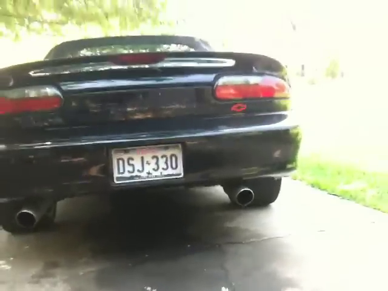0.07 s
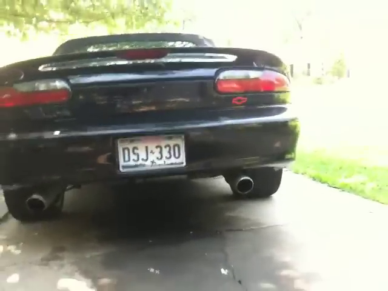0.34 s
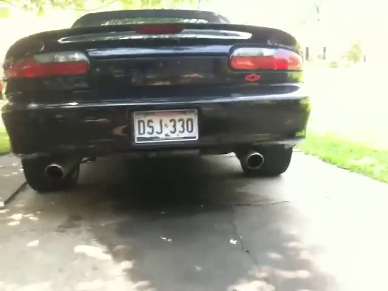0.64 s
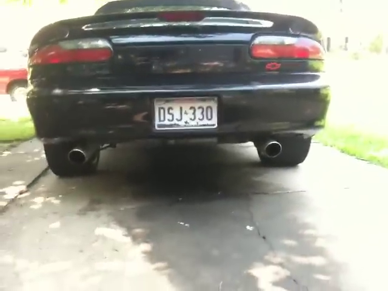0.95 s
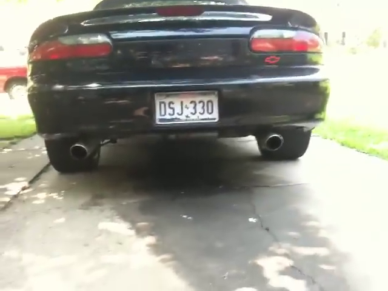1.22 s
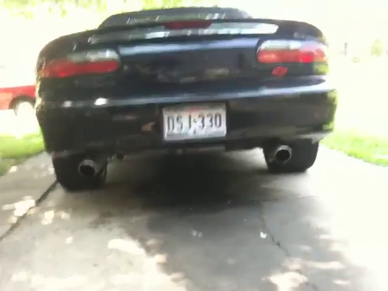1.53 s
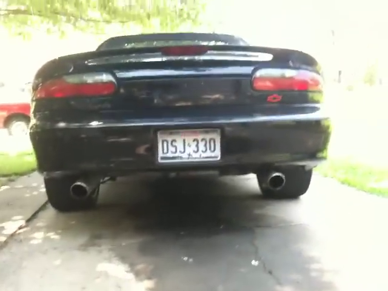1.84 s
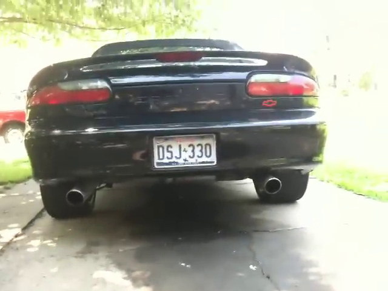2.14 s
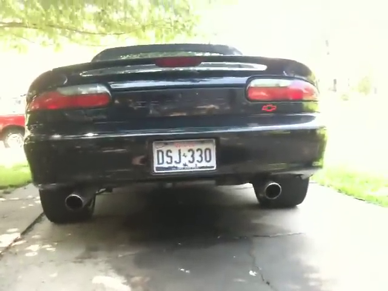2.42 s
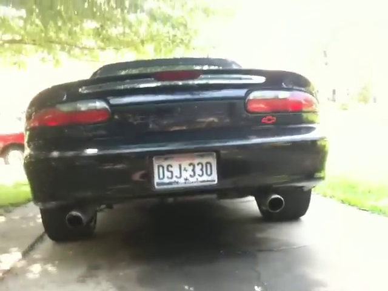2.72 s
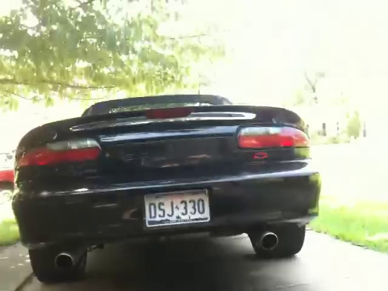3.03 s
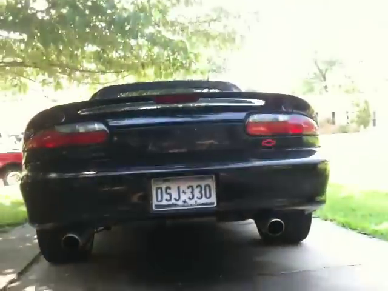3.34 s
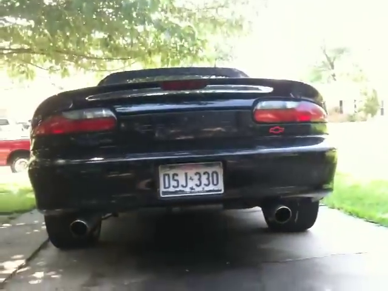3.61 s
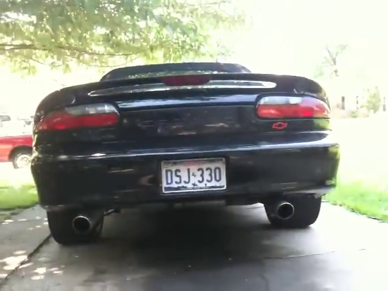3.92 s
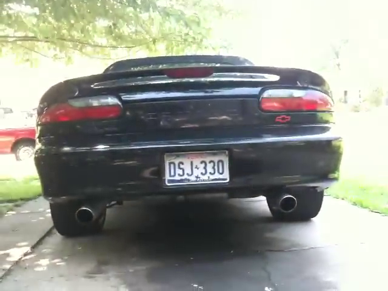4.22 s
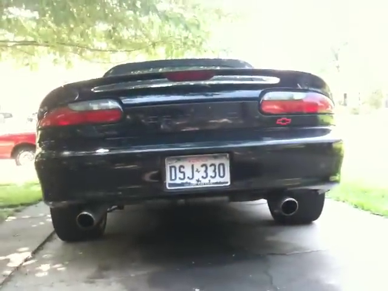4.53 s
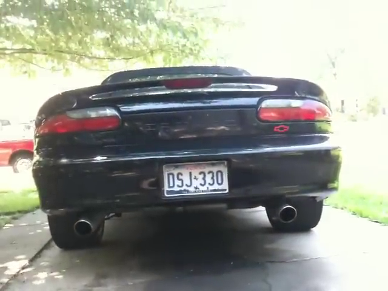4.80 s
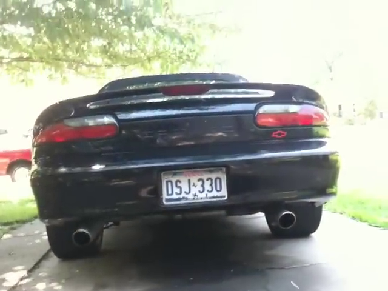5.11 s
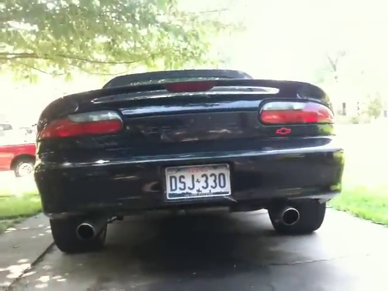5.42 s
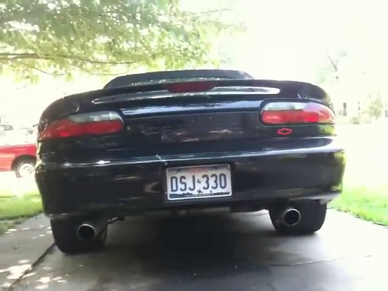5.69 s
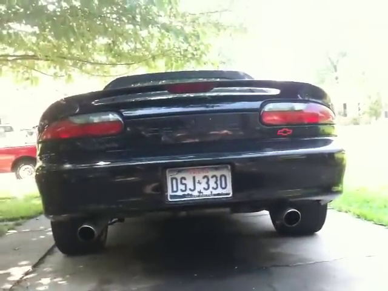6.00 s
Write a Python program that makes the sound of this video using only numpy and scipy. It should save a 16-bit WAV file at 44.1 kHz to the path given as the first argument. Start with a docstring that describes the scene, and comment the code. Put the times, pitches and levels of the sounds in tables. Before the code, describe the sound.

A V8 car idles in an outdoor driveway, heard close behind its twin open exhaust pipes for about six seconds. The deep, loping rumble is there from the start, throbbing roughly six times a second over a low drone. The speed stays steady, with an occasional slightly harder throb. Between 0.3 and 0.7 seconds the tone shifts a little as the microphone moves behind the car. A soft hiss of gas pulses with the exhaust throughout. Light valve ticking slowly grows, with small, sharper metallic ticks scattered from about 0.8 seconds and more frequent after 2 seconds. A very faint thin whine fades in around 3.6 seconds and stays. Far below the engine, overhead leaves stir in a breeze, and a few faint, distant bird chirps come during the first 3 seconds. The idle carries on unchanged to the end.

```python
"""Idling V8 with open pipes

A V8 idles at about 700 rpm through two straight pipes, heard from behind the car in a driveway.
Each bank fires four unevenly spaced pulses per cycle and excites the standing waves of its own pipe,
so the rumble lopes over a low drone. Gas rushes at the tips, valves tick and a thin whine comes in.
Leaves stir overhead, with a few faint, far chirps."""
import sys
import numpy as np
from scipy import signal
from scipy.io import wavfile
from scipy.ndimage import uniform_filter1d

SR = 44100
rng = np.random.default_rng(int(sys.argv[2]) if len(sys.argv) > 2 else 0)


def transcribe(signal):
    """Save signal, clipped to [-1, 1], as a 16-bit WAV file at the path in sys.argv[1]."""
    frames = np.atleast_2d(signal).T
    limited = np.clip(frames, -1, 1)
    pcm = np.round(limited * 32767).astype(np.int16)
    wavfile.write(sys.argv[1], SR, pcm)


N = 271215
TIME = np.arange(N) / SR


# The idle hunts gently. Each row: time in seconds, speed in rpm.
IDLE_SPEED = [(0.0, 699.1), (0.26, 704.5), (0.51, 700.4), (0.77, 699.1), (1.03, 705.7), (1.28, 710.1),
              (1.54, 705.4), (1.79, 704.3), (2.05, 700.0), (2.31, 703.0), (2.56, 703.9), (2.82, 705.8),
              (3.08, 700.6), (3.33, 701.7), (3.59, 702.1), (3.84, 705.6), (4.1, 699.9), (4.36, 700.0),
              (4.61, 699.6), (4.87, 698.7), (5.13, 707.7), (5.38, 711.0), (5.64, 704.6), (5.89, 700.4),
              (6.15, 705.6)]

def crank_times(degrees):
    """A four-stroke cycle takes two turns: the times [cycle, angle] when the crank passes each angle."""
    t = np.arange(-SR, N + SR) / SR
    cycles = np.cumsum(curve(IDLE_SPEED, t)) / (2 * 60 * SR)
    cycles -= cycles[SR]
    return np.interp(np.arange(-4, 38)[:, None] + np.asarray(degrees) / 720, cycles, t)


def crank_angle():
    """The phase of the engine cycle at every sample, from 0 to 720 degrees."""
    starts = crank_times([0]).ravel()
    return np.interp(TIME, starts, np.arange(len(starts))) % 1 * 720


# The firings of one cycle. Each row: crank angle in degrees, pipe, pulse level in dB.
FIRINGS = [(33.97, "right", -7), (125.97, "left", -3), (220.27, "right", 0.43), (305.86, "right", 0.34),
           (398.46, "left", -2), (487.2, "right", -2), (578.4, "left", -1.13), (664, "left", -3.5)]
# Drive of the strongest waves (the boom) and of those above. Each row: time in seconds, gain in dB.
BOOM_GAIN = [(0.0, -2.3), (0.34, 0.4), (0.68, -2.5), (1.02, -0.3), (1.37, -0.5), (1.71, -0.0), (2.05, -2.1),
             (2.39, -0.5), (2.73, 2.2), (3.08, 0), (3.42, -0.4), (3.76, -2.6), (4.1, -0.8), (4.44, -1),
             (4.78, -1.7), (5.12, -4), (5.47, 0.8), (5.81, -0.9), (6.15, -4.3)]
UPPER_GAIN = [(0.0, -2.8), (0.68, -2.4), (1.37, -2), (2.05, -4), (2.73, -2.0), (3.42, -2.2), (4.1, -3.0),
              (4.78, -1.2), (5.47, -2), (6.15, -1.6)]
# Turbulence against the clean pulse. Each row: frequency in Hz, relative level in dB.
TURBULENCE = [(60, 11), (120, -15), (220, -15.5), (260, -12), (350, -4.5), (450, 2.5)]

def pipe(side, modes, level_db=0.65, puff_s=0.0093, scatter_db=0.92, jitter_s=0.00012):
    """Impulse excitation: each firing's clean pulse and turbulent puff ring the pipe's standing waves."""
    degrees, pulse_db = np.transpose([(angle, db) for angle, bank, db in FIRINGS if bank == side])
    fired = crank_times(degrees)
    fired += jitter_s * rng.standard_normal(fired.shape)
    burn_db = level_db + pulse_db + scatter_db * rng.standard_normal(fired.shape)  # no two burn alike
    boom_db, upper_db = curve(BOOM_GAIN, fired), curve(UPPER_GAIN, fired)
    millisecond = SR / 1000
    eddies = rng.standard_normal(N + SR)
    out = np.zeros(N + SR)
    for hz, width_hz, mode_db in modes:
        boom_share = np.interp(hz, [180, 200, 305, 325], [.2, 1, 1, .1])
        upper_share = np.interp(hz, [305, 325], [0, 1])
        drive_db = burn_db + boom_share * boom_db + upper_share * upper_db
        pulses = click_train(fired, millisecond * from_db(drive_db))
        gas = from_db(curve(TURBULENCE, hz)) * puffs(pulses, puff_s) * eddies
        out += from_db(mode_db) * resonate(pulses + gas, hz, width_hz)
    return out[SR:]


# Standing waves of each pipe. Each row: frequency in Hz, bandwidth in Hz, gain in dB.
LEFT_MODES = [(98.7, 7.9, -20), (109.94, 6.2, -10.5), (134.7, 16.7, -9.5), (151.55, 15.7, 3),
              (201.7, 19, -9.5), (215.86, 14.1, 8), (241.4, 6.4, 0.6), (257.4, 13.4, 3.5), (301.5, 18, -16),
              (330.5, 51, -11), (350.9, 10.6, -6.4), (356.4, 9.6, -10.5), (402.5, 24.3, -14),
              (447.7, 19, -30.5)]
RIGHT_MODES = [(62.5, 17, -40), (96, 10, -25), (122.6, 6.3, -1.3), (132.2, 12.2, -2.1), (158.37, 5.7, -4.5),
               (183.8, 27, -8.5), (211.36, 11, 5), (228, 10.2, 8), (246.07, 7.5, 3.5), (284.4, 25.7, -13.0),
               (345.85, 11.2, -6), (363.4, 8.9, -4), (384.4, 9.8, -16.5), (431, 8, -19.5)]

def exhaust():
    """Superposition: the uneven pulses of the two banks bunch into one throb per cycle."""
    return pipe("left", LEFT_MODES) + pipe("right", RIGHT_MODES)


# Swells of the drone. Each row: crank angle and half width in degrees, level in dB.
DRONE_SWELLS = [(203, 71, -29.5), (600, 44, -32)]

def drone(hz=248.7, floor_db=-39.5, boom_follow=1.3):
    """Resonance: the strongest wave of the pipes rings on and swells between throbs."""
    envelope = from_db(boom_follow * curve(BOOM_GAIN)) * swells(DRONE_SWELLS, floor_db, crank_angle())
    return envelope * wavering_tone(hz, waver_hz=4)


# Throbs that come out harder. Each row: time in seconds, extra level in dB.
HARD_THROBS = [(0.805, 2), (1.125, 1), (1.308, 2), (1.655, 2), (2.5, 3), (2.832, 4), (3.867, 3),
               (4.022, 2.5), (4.37, 4), (5.568, 2.5)]

def throb_accents(half_s=0.01, usual_db=-0.5):
    """Amplitude modulation: a brief rise in gain makes the odd throb stand out."""
    extra_db = sum(db * np.exp(-.5 * ((TIME - s) / half_s) ** 2) for s, db in HARD_THROBS)
    return from_db(usual_db + extra_db)


# Upper pipe tones in three groups. Each row: frequency in Hz, bandwidth in Hz, level in dB.
BODY_MODES = [(480, 10.6, -60), (533.5, 28, -51.5), (578.4, 20, -52.5), (617, 16, -62)]
EDGE_MODES = [(695, 25, -60), (729, 27, -58), (854, 34, -63), (1031, 28, -69)]
RING_MODES = [(778.5, 20.5, -53)]
# Surges of gas. Each row: crank angle and half width in degrees, then body, edge and ring gains in dB.
GAS_SURGES = [(14, 33, 1.5, -13, -10), (60, 14, 1, 0, 0), (155, 22, -8.5, 1.5, -1), (295, 37, -0.5, -5, -5),
              (510, 17, -1, 5.5, -0.5), (560, 12, 0.5, 4.5, 3), (584, 14, 3.5, -0.5, 3),
              (630.5, 13.6, 6, -7, 4.5), (685, 17, -13, 1, -1), (724, 13, 2, -12, -10)]
# Slow drift of the chuffs. Each row: time in seconds, gain in dB.
CHUFF_GAIN = [(0, -0.5), (1, 0), (1.35, 1), (2, 0), (3.1, -1), (3.9, 1), (4.6, -1), (5.15, 1), (6.15, -0.5)]

def chuff(scatter_db=1.5):
    """Forced vibration: gas surges sound the upper pipe tones with the same accents in every cycle."""
    angle, surges = crank_angle(), np.array(GAS_SURGES)

    def group(modes, column, gain_db, floor_db):
        tones = sum(from_db(db) * noise_band(hz, width_hz, N + SR) for hz, width_hz, db in modes)
        total_rms = np.linalg.norm(from_db([db for _, _, db in modes]))
        steady = total_rms * evened(tones, over_s=0.015)[SR:]
        return from_db(gain_db) * swells(surges[:, [0, 1, column]], floor_db, angle) * steady

    body = group(BODY_MODES, column=2, gain_db=-2.5, floor_db=-8.5)
    edge = group(EDGE_MODES, column=3, gain_db=0.5, floor_db=-8)
    ring = group(RING_MODES, column=4, gain_db=0, floor_db=-10)
    return from_db(curve(CHUFF_GAIN) + scatter_db * wander(per_s=20)) * (body + edge + ring)


# Colour of the pipes from one side. Each row: frequency in Hz, bandwidth in Hz, gain in dB.
SIDE_COLOUR = [(256, 40, -10), (291.5, 13, 10.5), (405, 30, -9.5), (464.4, 12, 14.5), (550, 100, -18),
               (632, 14, 9.5)]

def step_behind(pipes, start_s=0.3, step_s=0.37):
    """Timbre depends on position: the side colour fades as the listener steps behind the car."""
    aside = pipes
    for hz, width_hz, db in SIDE_COLOUR:
        aside = aside + (from_db(db) - 1) * resonate(aside, hz, width_hz, stages=1)
    moved = np.clip((TIME - start_s) / step_s, 0, 1)
    return (1 - moved) * aside + moved * pipes


# Spectrum of the gas rush and engine bay. Each row: frequency in Hz, relative density in dB.
RUSH_SPECTRUM = [(800, -3), (940, -3), (1130, -0.5), (1400, -13), (1600, -9), (2000, -6.5), (2600, -10.5),
                 (3100, -12), (3600, -16), (4800, -14.5), (6000, -16.5), (8000, -17), (11500, -25.5),
                 (15500, -29.5)]

def gas_rush(level_db=-54.0, pulsing=0.12, flutter_db=1.33):
    """Flow noise: gas hisses unevenly out of the tips, a little harder after each firing."""
    fired = crank_times([angle for angle, _, _ in FIRINGS])
    gusts = rms_one(puffs(click_train(fired, np.ones(fired.shape)), decay_s=0.014)[SR:])
    level = from_db(level_db + flutter_db * wander(per_s=50))
    return level * (1 + pulsing * (gusts - 1)) * coloured_noise(RUSH_SPECTRUM)


# Resonances of the valve ticks. Each row: frequency in Hz, bandwidth in Hz, relative level in dB.
VALVE_MODES = [(1900, 1160, -51), (2040, 210, -58), (2900, 1300, -57.5)]

def valves(first_degrees=63, blur_s=0.0024, scatter_db=5, start_db=-17.5, rise_db_per_s=0.88):
    """Impact noise: a valve seats every quarter turn; its tick is blurred on the way under the car."""
    seated = crank_times(first_degrees + np.arange(0, 720, 90))
    sizes = from_db(scatter_db * rng.uniform(-1, 1, seated.shape))
    taps = puffs(click_train(seated, sizes), decay_s=0.0028)[SR:]
    bursts = uniform_filter1d(taps, int(blur_s * SR) + 1) * rng.standard_normal(N)
    ringing = sum(from_db(db) * rms_one(resonate(bursts, hz, width)) for hz, width, db in VALVE_MODES)
    return from_db(start_db + rise_db_per_s * TIME) * ringing


# Sharper ticks from under the car. Each row: start in seconds, frequency in Hz, level in dB.
METAL_TICKS = [(0.79, 2110, -53), (1.53, 2120, -49), (1.73, 2080, -52), (2.173, 2040, -46),
               (2.454, 1880, -52), (2.536, 2150, -49.5), (2.959, 1950, -52), (3.026, 2060, -47),
               (3.263, 1990, -53), (3.71, 2000, -51), (3.775, 1990, -45.5), (4.287, 1880, -47),
               (4.481, 1900, -56), (4.612, 3020, -50), (4.824, 3120, -49), (4.93, 1970, -51),
               (5.08, 2050, -47), (5.247, 2060, -47), (5.43, 1990, -48), (5.671, 2030, -49),
               (6.012, 1900, -53)]

def metal_ticks(decay_s=0.011, attack_s=0.0007):
    """Damped free vibration: each tick rings briefly in one metal resonance."""
    out = np.zeros(N)
    for s, hz, db in METAL_TICKS:
        age = np.maximum(TIME - s, 0)
        envelope = np.minimum(age / attack_s, 1) * np.exp(-age / decay_s)
        out += from_db(db) * envelope * np.sin(2 * np.pi * hz * age)
    return out


def whine(hz=1024, level_db=-64.5, start_s=3.6, rise_s=0.58):
    """A nearly pure tone from the engine bay fades in and stays."""
    fade_in = np.clip((TIME - start_s) / rise_s, 0, 1)
    return from_db(level_db) * fade_in * wavering_tone(hz, waver_hz=7)


# Spectrum of the leaves. Each row: frequency in Hz, relative density in dB.
LEAF_SPECTRUM = [(3000, -12), (6500, 2), (8300, 5), (10000, 3.5), (14000, 1.5), (16000, -5)]
# Gusts of the breeze. Each row: peak time and half width in seconds, level in dB.
BREEZE_GUSTS = [(.2, 0.25, -64), (1.17, 0.18, -59.5), (2.7, 0.34, -67), (3.72, 0.18, -61.5),
                (4.65, 0.11, -65), (5.5, 0.81, -67)]

def leaves(calm_db=-68.5):
    """Broadband noise from the leaves overhead swells with the breeze."""
    return swells(BREEZE_GUSTS, calm_db, TIME) * coloured_noise(LEAF_SPECTRUM)


# Faint rustles. Each row: peak time and half width in seconds, centre and bandwidth in Hz, level in dB.
SOFT_RUSTLES = [(.25, 0.28, 1340, 520, -59), (.28, 0.18, 4430, 895, -61)]

def rustles():
    """Band-limited noise swells and fades under a Gaussian envelope."""
    return sum(from_db(db) * np.exp(-((TIME - s) / half_s / 2) ** 2) * noise_band(hz, width_hz)
               for s, half_s, hz, width_hz, db in SOFT_RUSTLES)


# Each row: start and length in seconds, first pitch, last pitch and bandwidth in Hz, level in dB.
FAR_CHIRPS = [(0.07, 0.089, 12100, 12000, 700, -67), (0.422, 0.082, 12200, 10200, 900, -64.5),
              (0.53, 0.13, 10400, 9550, 600, -71), (0.775, 0.11, 3170, 3040, 30, -61),
              (0.895, .03, 3130, 3080, 60, -67), (0.92, 0.057, 2990, 2780, 80, -65),
              (1.787, 0.12, 3180, 3090, 60, -65), (1.92, 0.047, 3200, 3050, 80, -65),
              (1.975, 0.042, 2920, 2750, 60, -61.5), (2.646, 0.3, 8900, 8100, 600, -67.5),
              (2.681, .28, 11700, 10500, 1500, -72)]

def chirps(broken_db=3.0, gain_db=2.88):
    """Falling whistles are broken up on their way through the trees; phase noise makes wide ones buzz."""
    out = np.zeros(N)
    for s, length, start_hz, end_hz, width_hz, db in FAR_CHIRPS:
        along = np.clip((TIME - s) / length, 0, 1)
        phase = 2 * np.pi * np.cumsum(start_hz + (end_hz - start_hz) * along) / SR
        lowpass = signal.butter(2, width_hz / 2, fs=SR, output="sos")
        phase_noise = np.arctan2(*signal.sosfilt(lowpass, rng.standard_normal((2, N))))
        envelope = np.sqrt(2 * np.abs(np.sin(np.pi * along)))
        out += from_db(db) * envelope * np.cos(phase + phase_noise)
    return from_db(gain_db + broken_db * wander(per_s=70)) * out


def from_db(db):
    """Decibels to amplitude ratio."""
    return 10 ** (np.asarray(db) / 20)


def rms_one(x):
    """Normalisation to unit power."""
    return x / np.sqrt(np.mean(x ** 2) + 1e-20)


def evened(x, over_s):
    """Normalisation of the running power to one."""
    return x / np.sqrt(uniform_filter1d(x ** 2, int(over_s * SR) + 1) + 1e-12)


def curve(rows, at=TIME):
    """Linear interpolation in a two-column table."""
    return np.interp(at, *np.transpose(rows))


def swells(rows, floor_db, at):
    """Powers add: the gain of bell-shaped swells (centre, half width, dB) over a steady floor."""
    power = sum(from_db(db) ** 2 * np.exp(-.5 * ((at - centre) / width) ** 2)
                for centre, width, db in rows)
    return np.sqrt(from_db(floor_db) ** 2 + power)


def wander(per_s):
    """Random drift: straight lines join Gaussian values of unit spread."""
    knots = np.arange(600) / per_s - 1
    return np.interp(TIME, knots, rng.standard_normal(len(knots)))


def wavering_tone(hz, waver_hz):
    """Frequency modulation: a sine of rms 1 whose pitch wanders a little."""
    return np.sqrt(2) * np.sin(2 * np.pi * np.cumsum(hz + waver_hz * wander(per_s=8)) / SR)


def click_train(times, sizes):
    """Impulses on a time line that starts one second early, so that the pipes already ring."""
    at = np.round((times.ravel() + 1) * SR).astype(int)
    return np.bincount(at, sizes.ravel(), N + SR)[:N + SR]


def puffs(clicks, decay_s):
    """Exponential decay: an envelope that spreads out the energy of each click."""
    keep = np.exp(-1 / (decay_s * SR))
    return np.sqrt(signal.lfilter([1 - keep], [1, -keep], clicks ** 2 + 1e-18))


def resonate(x, hz, width_hz, stages=2):
    """Identical resonators in series, each of the given bandwidth and a peak gain of 1."""
    for _ in range(stages):
        x = signal.lfilter(*signal.iirpeak(hz, hz / width_hz, fs=SR), x + 1e-18)
    return x


def noise_band(hz, width_hz, samples=N):
    """Resonance narrows white noise to one band of rms 1."""
    return rms_one(resonate(rng.standard_normal(samples), hz, width_hz))


def coloured_noise(spectrum):
    """Spectral shaping: noise of rms 1 with a smooth spectrum and a steep lower edge."""
    points_hz, points_db = np.transpose(spectrum)
    hz = np.arange(1, N + 2) * SR / (2 * N)
    gain = from_db(np.interp(np.log(hz), np.log(points_hz), points_db))
    gain /= np.hypot(1, (points_hz[0] / hz) ** 2)
    taps = signal.firwin2(1025, np.linspace(0, 1, N + 1), np.r_[gain[:-1], 0], nfreqs=2 ** 19 + 1)
    return rms_one(signal.fftconvolve(rng.standard_normal(N + len(taps) - 1), taps, "valid"))


def scene():
    """Sound pressures add: the car close by, the garden around it."""
    pipes = throb_accents() * (exhaust() + drone()) + chuff()
    car = step_behind(pipes) + gas_rush() + valves() + metal_ticks() + whine()
    fade_in = np.minimum(TIME / .004, 1)
    return fade_in * (car + leaves() + rustles() + chirps())[None]


def record(dry):
    """Band limiting: a small microphone drops the deepest bass, and the top is cut."""
    thin = signal.sosfilt(signal.butter(2, 40, "high", fs=SR, output="sos"), dry)
    return signal.sosfilt(signal.ellip(10, .1, 80, 15700, fs=SR, output="sos"), thin)


dry = scene()
out = record(dry)
transcribe(out)
```